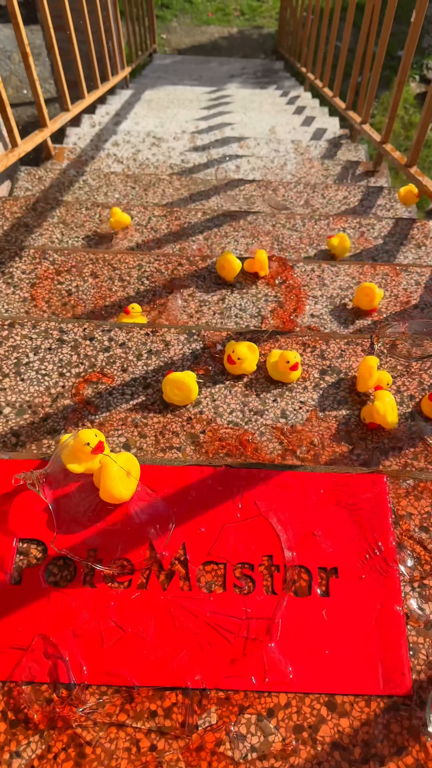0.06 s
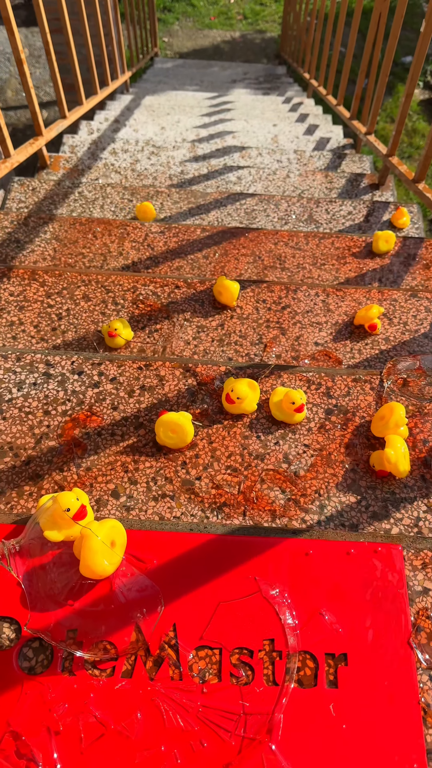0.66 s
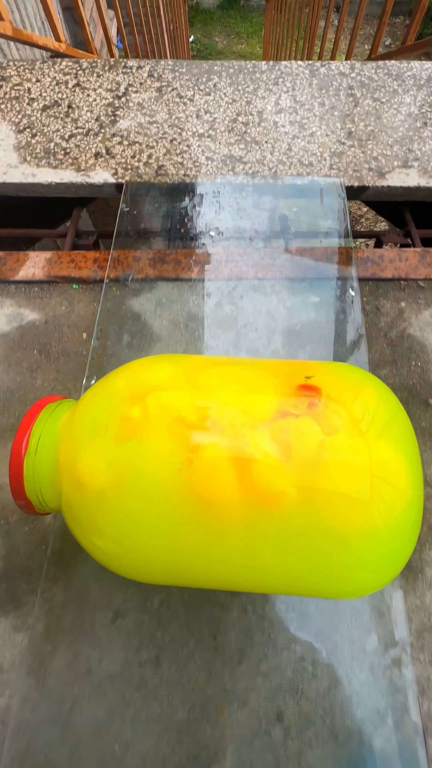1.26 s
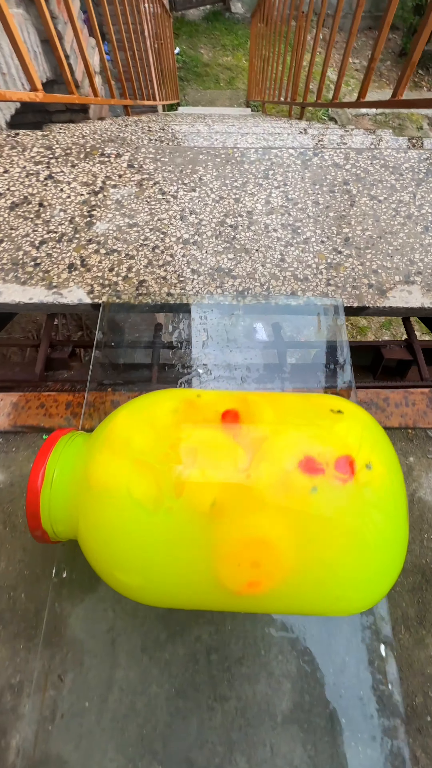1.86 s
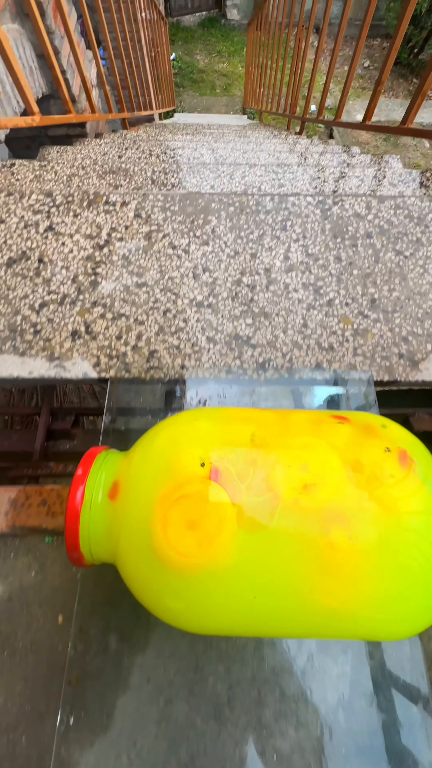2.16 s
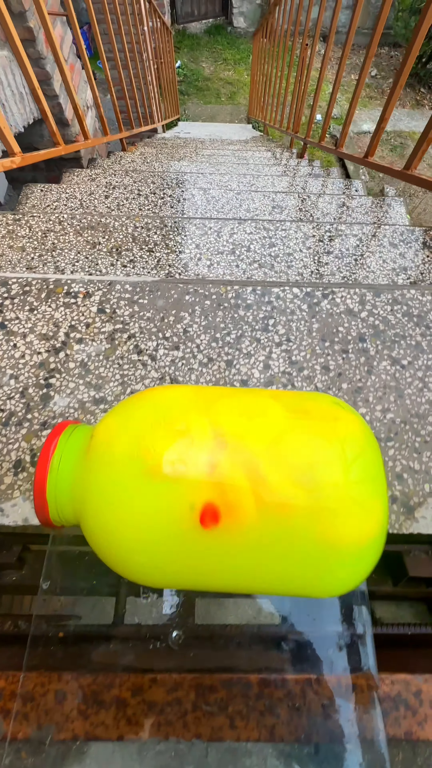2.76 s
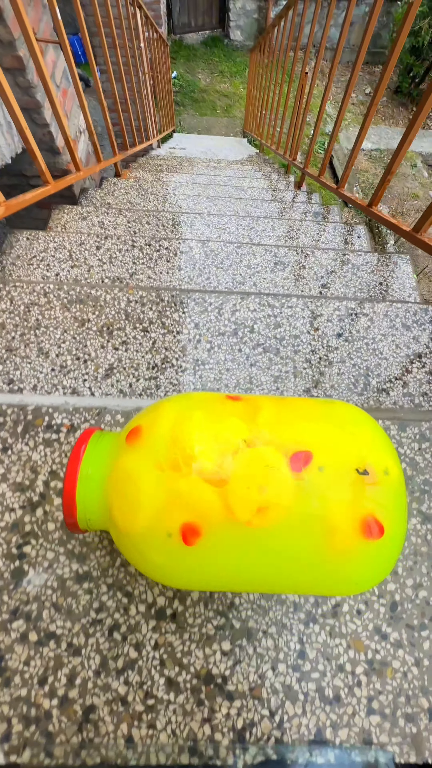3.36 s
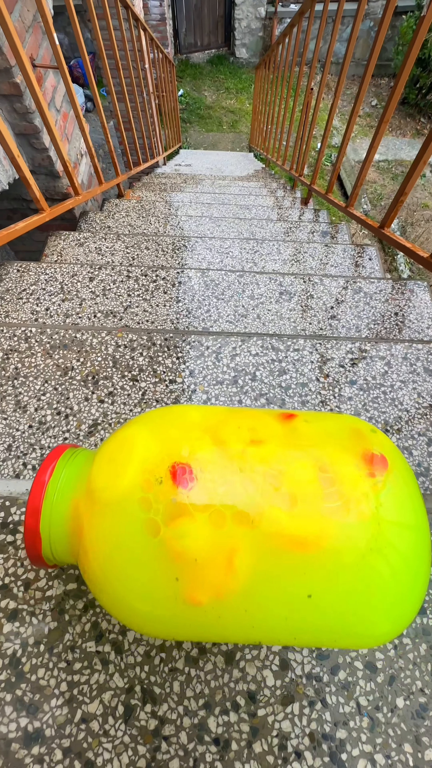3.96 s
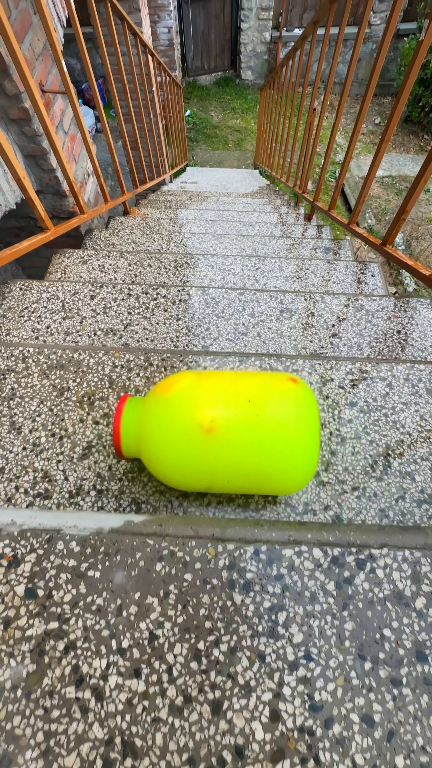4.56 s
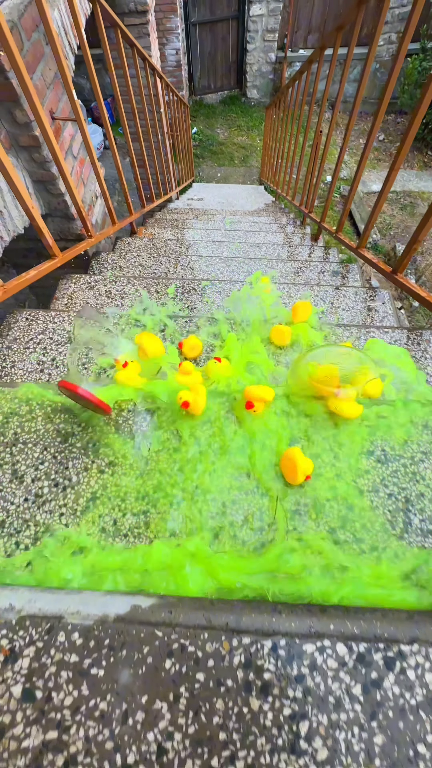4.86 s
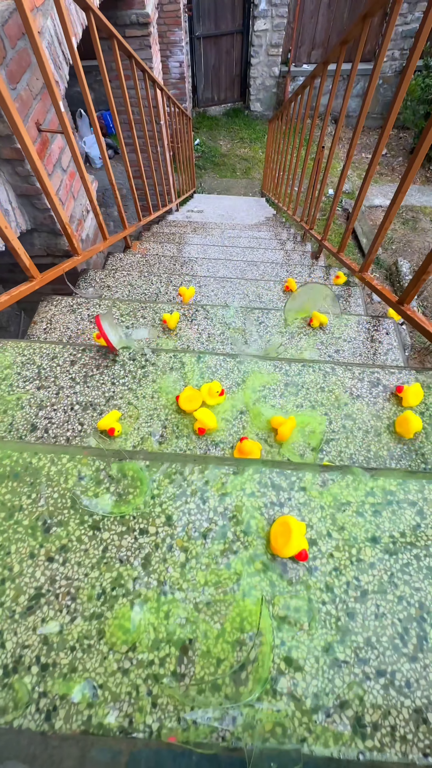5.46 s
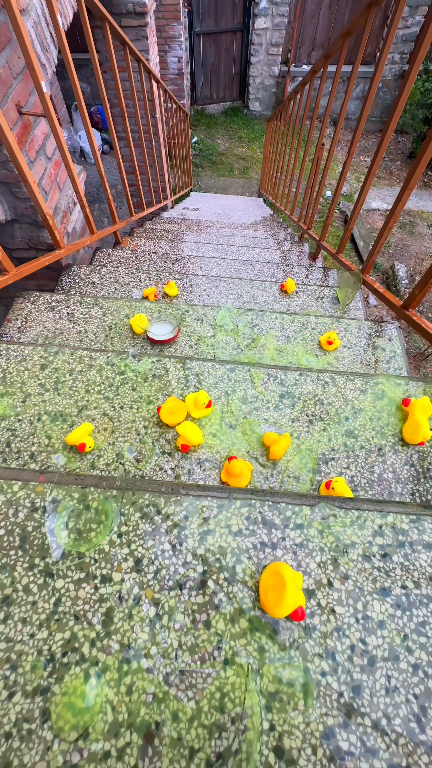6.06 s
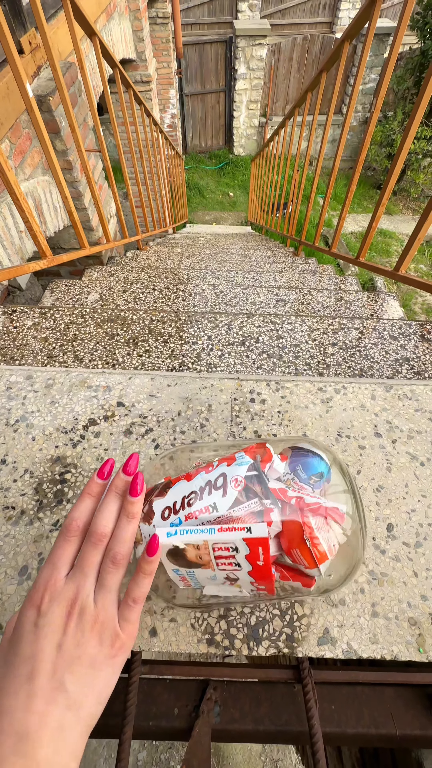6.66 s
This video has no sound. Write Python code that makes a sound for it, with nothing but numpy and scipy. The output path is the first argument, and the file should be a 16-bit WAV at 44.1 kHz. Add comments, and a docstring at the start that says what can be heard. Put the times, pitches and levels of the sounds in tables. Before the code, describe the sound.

Shards clink to rest, then a liquid-filled glass jar rolls, grinds over gritty stone steps and bursts, splashing and scattering ringing pieces.

```python
"""The last shards of a broken jar clink to rest on outdoor stone steps, each ringing on its own modes.
Abruptly, a jar full of liquid and rubber ducks rumbles over a glass pane that rattles on its steel frame.
It crunches across gritty stone, thuds down a step and bursts: a splash, clinking shards, large ringing
pieces. After a second abrupt change a hand nudges a jar of sweets and the wrappers rustle.
Steady outdoor air lies under it all."""
import sys
import numpy as np
from scipy import signal
from scipy.fft import rfft, irfft, next_fast_len
from scipy.io import wavfile
from scipy.ndimage import map_coordinates

SR = 44100
rng = np.random.default_rng(int(sys.argv[2]) if len(sys.argv) > 2 else 0)


def to_wav(s):
    """Save 16-bit WAV."""
    ch = np.atleast_2d(s).T  # columns
    pcm = np.round(np.clip(ch, -1, 1) * 32767)  # PCM
    wavfile.write(sys.argv[1], SR, pcm.astype(np.int16))


N = 295458
TIME = np.arange(N) / SR
T = np.arange(int(.4 * SR)) / SR  # seconds within one impact
ROLL_S, BURST_S, SWEETS_S = 1.278, 4.55, 6.192
TOP_HZ = 15900

# Resonances of the glass pane and the steel frame. Each row: centre in Hz, width in Hz, gain in dB.
PANE_MODES = [(360, 25, -2), (516, 32, 2), (614, 29, 2), (702.4, 22.5, 4), (836, 35, -1), (980, 220, -10.5),
              (1442, 27, -3.5), (1584, 29, -3.5), (1873, 25, -7), (2166, 190, -9.5)]
FRAME_MODES = [(62, 32, -2), (85.4, 10, -0.5), (121.4, 14, 1), (177.3, 22.3, 1), (242, 12.6, -1.5),
               (287.7, 12.6, -1.5), (369, 113, -8.5)]
# Tone of chattering glass and of crunching grit. Each row: frequency in Hz, gain in dB.
CHATTER_EQ = [(530, -8.5), (900, -4), (2180, -1), (3130, -8.5), (3700, -3), (5510, -11.5), (9150, -9),
              (10800, -30), (15000, -23)]
CRUNCH_EQ = [(350, -14.5), (600, -10), (993, -10), (1100, -9), (1300, -8), (1880, -14), (2570, -13),
             (2950, -12), (3750, -14), (4940, -10.5), (8870, -9), (9800, -5), (11300, -19), (15500, -22.5)]


def roll_strength():
    """Gain of the jar's rumble, from the start of its roll until it bursts."""
    # The rumble's contour. Each row: time in seconds, relative level in dB.
    contour = [(1.31, -42.5), (1.49, -39.5), (1.89, -39.5), (2.36, -41.5), (2.88, -33.5), (3.54, -44.5),
               (3.76, -42.5), (4.15, -48.5), (4.54, -48)]
    return amp(np.interp(TIME, *np.transpose(contour))) * (TIME > ROLL_S) * (1 - ramp(BURST_S, .012))


def rolling():
    """Bumps in the rolling glass drive the pane's resonances, less once the jar is on the stone."""
    on_stone = ramp(2.84, 0.16)
    drive = roll_strength() * amp(-9 * on_stone + 3 * wobble(rate=38))
    bumps = resonated(resonated(contacts(rate=500, spread_db=4, size=N), PANE_MODES), PANE_MODES)
    hum = amp(-7) * resonated(rng.standard_normal(N), PANE_MODES)
    drone = unit(softened(bumps + hum))
    drift = 1 + .03 * wobble(rate=5)  # the moving weight detunes the pane
    return drive * np.interp(np.cumsum(drift), np.arange(N), drone)


def rattles():
    """The pane slaps its frame in dying flurries of contacts; its edge buzzes and it rings on hollowly."""
    # Slaps. Each row: start in seconds, relative body and chatter levels in dB, chatter t60 in seconds,
    # hollow note in Hz (it depends on where the jar lies).
    slaps = [(1.559, -28, -33, 0.13, 688), (1.692, -21, -26, 0.077, 693), (1.9163, -5, -18, 0.055, 600),
             (1.924, -8.5, -22, 0.056, 641), (1.947, -4, -18.5, 0.069, 612), (1.958, -9.5, -28, 0.038, 608),
             (1.989, -13, -29.5, 0.066, 615.5), (2.007, -18.5, -27.5, 0.047, 612),
             (2.033, -21, -46, 0.034, 614), (2.16, -18, -18.5, 0.09, 687),
             (2.252, -25.5, -27.5, 0.034, 870), (2.297, -27, -20, 0.068, 970),
             (2.428, -35, -29, 0.075, 900), (2.592, -36, -24.5, 0.055, 950), (2.66, -15, -16, 0.28, 690.5)]
    # The hollow ring. Each row: multiple of the note, level in dB, t60 in seconds.
    partials = [(1, -2.5, 0.16), (1.17, -13, 0.087), (1.33, -7.5, 0.06), (0.6, -16, 0.26),
                (2.31, -15.5, 0.17)]
    # The pane's edge buzzing on steel. Each row: centre in Hz, width in Hz, gain in dB.
    edge_modes = [(1420, 62, 0), (1900, 44, -5), (2190, 190, -4), (2960, 88, -11.5), (3670, 120, -12.5),
                  (4180, 180, -12)]
    body, chatter, buzz, hollow = np.zeros((4, N))
    for s, body_db, chatter_db, t60, hz in slaps:
        flurry = contacts(rate=2800, spread_db=3) * decay(t60) * swell(rise=0.0036)
        knock = unit_attack(contacts(rate=4600, spread_db=4) * decay(t60 / 2))
        note = ring(np.multiply(partials, [hz, 1, 1]), spread_db=0.5) * swell(rise=0.00031)
        add(body, s - .003, amp(body_db) * knock)
        add(chatter, s - .003, amp(chatter_db) * flurry)
        add(buzz, s - .003, amp(body_db) * flurry)
        add(hollow, s - .001, amp(body_db) * note)
    return (amp(8.5) * resonated(body, PANE_MODES) + amp(12) * coloured(chatter, CHATTER_EQ)
            + resonated(buzz, edge_modes) + amp(-8.5) * hollow)


def crack(hz):
    """One grain splits in a tiny flurry, strongest around its own pitch."""
    flurry = contacts(rate=3400, spread_db=6.5) * decay(0.016) * swell(rise=0.001)
    pitched = resonated(flurry, [(hz, 0.4 * hz, 0)])
    return unit_attack(unit_attack(pitched) + amp(-3) * unit_attack(flurry))


def grit():
    """The jar grinds sand: separate cracks over a fine crunch, all ringing briefly in its wall."""
    # The coarsest grains splitting. Each row: start in seconds, relative level in dB, pitch in Hz.
    big_cracks = [(2.7549, -6, 1670), (2.831, -12.5, 7400), (2.899, -15, 6600), (2.913, -12.5, 6880),
                  (2.952, -13.5, 5800), (2.978, -17, 6700), (2.9975, -20, 1150), (3.0266, -7, 4570),
                  (3.0295, -9.5, 1250), (3.0488, -20, 1110), (3.059, -18, 5000), (3.0995, -16, 1410),
                  (3.1219, -14.5, 1170), (3.1451, -14, 1470), (3.151, -13, 4900), (3.1685, -21, 2400),
                  (3.195, -22, 1390), (3.225, -17.5, 4500), (3.2537, -14, 2970), (3.2887, -19, 1360),
                  (3.2982, -21, 1240), (3.3103, -9, 2960), (3.3275, -16, 1300), (3.3357, -18.5, 1230),
                  (3.385, -15.5, 5900), (3.39, -16, 4880), (3.449, -16, 2880), (3.551, -19, 7240),
                  (3.5737, -9.5, 6340), (3.581, -12, 4400), (3.611, -16, 6000), (3.6245, -17.5, 1230),
                  (3.7328, -16.5, 6100), (3.8085, -23.5, 1170), (3.841, -14, 3070), (3.85, -18.5, 1100),
                  (4.0216, -22, 6960), (4.0309, -16, 5630), (4.0625, -20, 2790), (4.119, -31, 5920),
                  (4.152, -31.5, 6870), (4.347, -32, 4500)]
    # Into thicker sand, out again and slowing. Each row: time in seconds, relative level in dB.
    grinding = [(2.73, -57), (2.9, -31), (3.06, -27), (3.27, -28), (3.335, -20), (3.41, -31.5),
                (3.435, -40.5), (3.48, -24), (3.54, -42), (3.64, -29.5), (3.8, -47), (3.97, -55.5)]
    # The jar's wall. Each row: centre in Hz, width in Hz, gain in dB.
    wall_modes = [(1146, 82, -6), (1306, 124, -2), (2950, 130, -1), (4910, 140, -4), (5740, 90, -4)]
    stone_s, step_edge_s = 2.72, 3.98
    # Dust on the pane crunches louder as the jar gathers speed.
    dust = amp(-47.5 + 7 * (TIME - ROLL_S)) * (TIME > ROLL_S) * (TIME < stone_s)
    sand = amp(np.interp(TIME, *np.transpose(grinding))) * (TIME > stone_s)
    bed = dust + sand
    # Each big cracked grain is ground on under the glass.
    crumb_power = sum((amp(db - 19.5) * envelope(s, attack=0.0037, fade_db_per_s=115)) ** 2
                      for s, db, _ in big_cracks)
    load = np.sqrt(bed ** 2 + crumb_power) * (1 - ramp(step_edge_s, 0.066))
    coarse = softened(contacts(rate=420, spread_db=5, size=N)) * amp(3.5 * wobble(rate=48))
    fine = contacts(rate=700, spread_db=5, size=N) + amp(-9) * rng.standard_normal(N)
    fine *= amp(3.5 * wobble(rate=91))
    crush = load * (amp(2) * coarse + amp(1.1) * fine)
    cracks = [(s, amp(db), hz) for s, db, hz in big_cracks]
    for s in [*scattered(ROLL_S, stone_s - ROLL_S, rate=7.6), *scattered(stone_s, .72, rate=34)]:
        gain = np.interp(s, TIME, bed) * amp(rng.normal(7, 2))  # ordinary grains follow the bed's level
        cracks.append((s, gain, 3070 * 2 ** (1.44 * rng.uniform(-1.4, 1))))
    for s, gain, hz in cracks:
        add(crush, s, gain * amp(-3) * crack(hz))
    wall = sum(resonated(crush, [mode]) for mode in wall_modes)
    return amp(6) * coloured(crush + amp(-2.5) * wall, CRUNCH_EQ)


def thuds():
    """The jar lands on stone: liquid damps its ring and surges; it rocks back on its hollow note."""
    # Landings. Each row: start in seconds, blow in dB, rocking in dB, hardness in dB per octave.
    landings = [(2.755, -9.5, -15, 4), (4.381, -13.5, -10.5, 0)]
    # The liquid-filled jar. Each row: frequency in Hz, level in dB, t60 in seconds.
    jar_modes = [(248, -22, 0.1), (367, 3.5, 0.022), (824, 1, 0.014), (1032, -13.5, 0.036),
                 (1342, -5.5, 0.02), (1750, -7, 0.013)]
    # Liquid jolted in the jar. Each row: frequency in Hz, gain in dB.
    slosh_eq = [(40, -16), (120, -12), (260, -5.5), (380, -20), (900, -29), (2000, -38), (8000, -36)]
    rock_hz, rock_every_s, rock_loss_db = 399, 0.02, 4.5
    rock = np.sin(2 * np.pi * rock_hz * T) * decay(0.05) * swell(rise=0.0021)
    out = np.zeros(N)
    for s, db, rock_db, hardness in landings:
        modes = [(hz, level + hardness * np.log2(hz / rock_hz), t60) for hz, level, t60 in jar_modes]
        add(out, s - .001, amp(db) * unit_attack(ring(modes, spread_db=2) * swell(rise=0.0032)))
        for k in range(4):
            add(out, s + 0.0135 + k * rock_every_s, amp(rock_db - k * rock_loss_db) * rock)
        slosh = unit(softened(coloured(rng.standard_normal(len(T)), slosh_eq)))
        add(out, s, amp(db - 11) * slosh * decay(0.3) * swell(rise=0.0014))
    return out


def soft_bumps():
    """Ducks, liquid and frame bump: soft bodies hold no steady note, sag in pitch and die quickly."""
    # Bumps. Each row: start in seconds, relative level in dB, starting pitch in Hz.
    bumps = [(0.043, -41.5, 389), (0.473, -38, 468), (0.686, -36.5, 433), (1.698, -18, 195),
             (2.763, -15.5, 531), (2.778, -18.5, 291), (2.829, -20, 257), (3.074, -24.5, 414),
             (4.724, -24, 718), (4.838, -27, 438), (4.935, -21.5, 439)]
    sag_octaves_per_s = 12
    out = np.zeros(N)
    for s, db, hz in bumps:
        pitch = hz * 2 ** (-sag_octaves_per_s * T) * (1 + 0.27 * wobble(rate=257, size=len(T)))
        tone = np.sin(2 * np.pi * np.cumsum(pitch) / SR)
        add(out, s, amp(db + 10) * tone * decay(0.058) * swell(rise=0.0022))
    return out


def burst():
    """The wall first crackles as cracks race through it, then collapses in one dense crash."""
    out = np.zeros(N)
    for s, db, t60 in [(4.543, -22, 0.08), (4.566, -15, 0.2)]:
        pieces = unit(coloured(contacts(rate=900, spread_db=2.5), CHATTER_EQ))
        add(out, s, amp(db) * swell(rise=0.0052) * decay(t60) * pieces)
    return out


def snap(t60):
    """Glass skids over the rough stone for a few milliseconds."""
    # Tone of the skid. Each row: frequency in Hz, gain in dB.
    skid_eq = [(200, -8.5), (500, 3), (1500, -2), (5000, 4.5), (9000, 4.5), (15000, -7.5)]
    return unit_attack(coloured(contacts(rate=8900, spread_db=0.5) * decay(t60), skid_eq))


def tick():
    """The hard first touch of a glass edge on stone."""
    return amp(-13) * snap(t60=0.004)


def chips():
    """Lesser fragments fall at random, ever weaker; returns rows for shards()."""
    rows = []
    for s in scattered(BURST_S, .62, rate=22):
        db = -27 - 7 * (s - BURST_S)
        hz = 2710 * 2 ** (0.9 * rng.uniform(-1, 1))
        rows.append((s, db, hz, 3.1 * hz, 0, 0.076, db - 9, 4 * rng.standard_normal()))
    return rows


def shards():
    """A fragment clinks on two strong modes over many weak ones; one edge touches, the other skids."""
    # The biggest fragments hit the steps. Each row: start in seconds, relative level in dB, low and high
    # mode in Hz, high over low in dB, t60 in seconds, relative snap level in dB, left over right in dB.
    fragments = [(4.5437, -30.5, 3080, 5600, -18, 0.1, -37.5, 2),
                 (4.557, -14.5, 2260, 6020, -5, 0.01, -13.5, -1),
                 (4.578, -18, 2590, 5650, 4, 0.034, -23, -2),
                 (4.586, -19.5, 2660, 3130, -3, 0.023, -24, -1),
                 (4.5925, -19, 1340, 7250, -10, 0.02, -34, -2),
                 (4.6158, -14, 1130, 4530, 3, 0.021, -29, -0.5),
                 (4.634, -25, 2620, 4730, -13, 0.04, -34, -4), (4.684, -21, 1640, 3720, -27, 0.04, -41, -4),
                 (4.7245, -16, 5959, 9200, 8, 0.028, -23, -1),
                 (4.747, -19.5, 1560, 6740, 4, 0.041, -16.5, -1.5),
                 (4.7958, -26.5, 1980, 7400, -1, 0.06, -39, -4),
                 (4.8503, -16.5, 1590, 4140, -3, 0.18, -15, -1),
                 (4.859, -14, 2560, 4570, 4, 0.053, -16, -3.5), (4.889, -28, 4520, 8140, -1, 0.09, -32, 0),
                 (4.872, -19, 3359, 4480, 2, 0.024, -32, -1),
                 (4.9353, -15.5, 1790, 3630, 3, 0.024, -13.5, -2),
                 (4.9675, -14.5, 1160, 2170, 6, 0.026, -34, -1.5),
                 (4.991, -13.5, 2519, 8440, -9, 0.068, -16, 2),
                 (5.0035, -14.5, 1240, 2534, 4.5, 0.027, -24, 0),
                 (5.0387, -21, 2250, 5350, -7, 0.021, -22, 0),
                 (5.0564, -13.5, 2120, 9280, 8, 0.045, -16.5, -2.5),
                 (5.072, -18.5, 2110, 8640, 2, 0.046, -25, 4),
                 (5.083, -18.5, 2090, 4581, 2, 0.18, -14.5, -8),
                 (5.112, -13.5, 6840, 9130, 9, 0.15, -23, -1.5),
                 (5.1284, -17.5, 2180, 2910, -0.5, 0.099, -27, 0),
                 (5.1894, -23, 4660, 6900, -5, 0.06, -39, 0), (5.2, -24.5, 3530, 4500, 8, 0.047, -39, -3),
                 (5.2243, -15.5, 3040, 5590, 11, 0.021, -21, -2),
                 (5.2752, -15.5, 5380, 8280, -7, 0.019, -36, -2),
                 (5.332, -26.5, 3560, 6080, 9, 0.09, -34, 0),
                 (5.3549, -19.5, 3480, 8000, 9, 0.044, -29, -5.5),
                 (5.433, -30.5, 2260, 6900, -5, 0.03, -34, -2), (5.5236, -26, 3570, 5620, 7, 0.04, -37, -2),
                 (5.6052, -24.5, 4490, 7190, -13, 0.22, -39, -5)]
    left, right = np.zeros((2, N))
    for s, db, low_hz, high_hz, high_db, t60, snap_db, left_db in [*fragments, *chips()]:
        pair = ring([(low_hz, 0, t60), (high_hz, high_db, t60)], spread_db=0.5)
        weak = ring(overtones(db=0, t60=1.05 * t60, count=9), spread_db=2)
        tone = (amp(0.5) * pair + amp(-3) * weak) * damped(kept_db=-5, contact=0.0091)
        skid = amp(snap_db - 1.5) * snap(t60=0.021) * swell(rise=0.00041)
        clink = amp(db) * (tone * swell(rise=0.00086) + tick()) + skid
        add(clink, rng.uniform(.002, .006), amp(db - 7) * snap(t60=0.031))
        add(left, s, amp(left_db / 2) * clink)
        add(right, s, amp(-left_db / 2) * clink)
    return np.array([left, right])


def bouncing(blows, modes, snap_db, weak_db, detune):
    """A piece bounces from edge to edge; the place of contact decides which of its modes ring most."""
    out = np.zeros(N)
    hz, first_db, second_db, t60 = np.transpose(modes)
    for s, db, place, free_s in blows:
        struck = np.column_stack([hz, first_db + np.clip(place, 0, 1) * (second_db - first_db), t60])
        weak = overtones(db=weak_db, t60=0.11, count=18)
        tone = ring(np.vstack([struck, weak]), spread_db=2, detune=detune)
        tone *= damped(kept_db=-7.5, contact=free_s)
        skid = amp(snap_db) * snap(t60=0.036)
        add(out, s, amp(db) * ((tone + skid) * swell(rise=0.0011) + tick()))
    return out


def large_pieces():
    """A piece of the burst jar's wall, then its base, bounce and ring on the stone."""
    # Bounces. Each row: start in seconds, level in dB, place of contact (held to 0-1),
    # free ringing in seconds.
    wall_blows = [(5.47, -19, 0, 0.014), (5.493, -25, 0.22, 0.018), (5.5686, -23, 1, 0.018),
                  (5.589, -24, 0.51, 0.018)]
    base_blows = [(5.6615, -12.5, 0.33, 0.0061), (5.669, -12.5, 0.3, 0.0088), (5.675, -12, 0.01, 0.012),
                  (5.709, -25, 0, 0.03), (5.8067, -25, 0.051, 0.025), (5.864, -15, 0.87, 0.015),
                  (5.8685, -11, 1, 0.023), (5.879, -20, 0.7, 0.01)]
    # Modes. Each row: frequency in Hz, level in dB at place 0 and at place 1, t60 in seconds.
    wall_modes = [(1640, -10, 5, 0.11), (1990, 5, -19, 0.063), (2560, -3, -11, 0.3), (3560, -13, -18, 0.12),
                  (4520, -3, 2, 0.25), (5980, 9.5, 7, 0.17), (6720, 2, 11, 0.18), (7190, 1, -4, 0.2),
                  (8950, -18, 2, .15)]
    base_modes = [(2032, -3.5, -16, 0.31), (2210, -2.5, -19, 0.38), (3197, -7, -20, 0.38),
                  (3548, -0.5, -25, 0.52), (4826, 6.5, -12, 0.16), (5073, -4, 6.5, 0.15),
                  (5970, -5, 0, 0.16), (6769, -6, -14, 0.14), (7330, 0, 2, 0.12), (8500, -12, -16, 0.076),
                  (9530, -19, 3, 0.13)]
    return (bouncing(wall_blows, wall_modes, snap_db=-2.5, weak_db=-4.5, detune=0.0017)
            + bouncing(base_blows, base_modes, snap_db=-4.5, weak_db=-8, detune=0.001))


def settling_pieces():
    """A sliver and a shoulder of the first jar clink to rest."""
    # Bounces. Each row: start in seconds, level in dB, place of contact (held to 0-1),
    # free ringing in seconds.
    sliver_blows = [(0.135, -27.5, -0.5, 0.02), (0.1482, -16, 0.15, 0.012), (0.3475, -18.5, 0.05, 0.01),
                    (0.381, -29.5, 0.6, 0.04), (0.4, -32, 0, 0.01), (0.571, -22.5, 0.4, 0.014),
                    (0.5755, -20, 2.5, 0.01), (0.717, -29, 1, 0.022), (0.748, -24.5, 1, 0.02),
                    (0.861, -35.5, 1.2, 0.026), (0.924, -40, 0.1, 0.0089)]
    shoulder_blows = [(0.0064, -25, 0.12, 0.051), (0.03, -27.5, 0.099, 0.045), (0.2636, -24, 1, 0.029),
                      (0.281, -28.5, 0.86, 0.0072)]
    # Modes. Each row: frequency in Hz, level in dB at place 0 and at place 1, t60 in seconds.
    sliver_modes = [(1073, -24, -23, 0.97), (1820, -21, -33, 0.14), (2824, -13.5, -2.5, 0.36),
                    (3950, -2.5, -25, 0.23), (5135, 5, 9, 0.1), (6580, 10, -8, 0.1), (7940, 7, -6, 0.1),
                    (9185, 5.5, -15, 0.092), (9600, -2, -2, 0.12)]
    shoulder_modes = [(1643, 0, -30, 0.25), (2430, -5.5, -28, 0.16), (2770, -5, -13, 0.26),
                      (3396, -5, 1, 0.22), (4150, -7, -23, 0.15), (5472, 2, -10, 0.26), (5980, -2, 7, 0.13),
                      (6610, 0, -13.5, 0.14), (7200, -4, 9.5, 0.1), (9050, -6, -2, 0.14),
                      (9930, -15, 6, 0.08)]
    return (bouncing(sliver_blows, sliver_modes, snap_db=-9.5, weak_db=-12.5, detune=0.0041)
            + bouncing(shoulder_blows, shoulder_modes, snap_db=-8, weak_db=-5.5, detune=0.0049))


def splinters():
    """Tiny pieces of the first jar settle on the stone in dull, fading ticks."""
    out = np.zeros(N)
    for s in scattered(0, ROLL_S, rate=14):
        add(out, s, amp(-32.5 - 20 * s) * snap(t60=0.013))
    return softened(out)


def flow():
    """Gains of sliding glass and of liquid: waves build quickly and drain away over a thin steady run."""
    # Waves landing on the steps. Each row: start in seconds, relative glass and liquid levels in dB.
    waves = [(4.549, -32, -28.5), (4.703, -32, -30.5), (4.86, -27.5, -33.5), (5.029, -27.5, -37.5),
             (5.67, -36, -57)]
    skitter_db, trickle_db = -48, -46.5
    run = envelope(BURST_S, attack=0.011, hold=1.44, fade_db_per_s=44)
    power = (amp([[skitter_db], [trickle_db]]) * run) ** 2
    for s, glass_db, water_db in waves:
        power += (amp([[glass_db], [water_db]]) * envelope(s, attack=0.011, fade_db_per_s=77)) ** 2
    return np.sqrt(power) * (TIME < SWEETS_S)


def spill():
    """Splinters tinkle and skitter down the steps while the liquid bubbles and splashes out."""
    glass, water = flow()
    tinkle = pings(rate=130, centre_hz=3700, octaves=1.35, cycles=300, spread_db=3.5, rise=0, count=3)
    skitter = unit(coloured(contacts(rate=260, spread_db=5, size=N), CRUNCH_EQ))
    bubbles = pings(rate=370, centre_hz=817, octaves=1.31, cycles=52, spread_db=8.5, rise=0.14, count=1)
    # Liquid hitting stone. Each row: frequency in Hz, gain in dB.
    splash_eq = [(88, -54), (150, -9), (280, -18), (418, -9), (975, -8.5), (1580, -1), (1930, -6),
                 (2500, -2.5), (3250, -44), (5500, -120)]
    splash = unit(coloured(contacts(rate=1600, spread_db=31, size=N), splash_eq))
    return (glass * (amp(2) * tinkle + amp(-3.5) * skitter)
            + water * (amp(-0.6) * bubbles + amp(-3) * splash))


def frame():
    """The rolling jar shakes the steel frame into a low rumble."""
    shaking = resonated(contacts(rate=830, spread_db=2.5, size=N), FRAME_MODES)
    return amp(4) * roll_strength() * unit(softened(shaking))


def boom():
    """The weight of the liquid booms on the step as the jar bursts."""
    out = np.zeros(N)
    bass = coloured(rng.standard_normal(len(T)), [(20, -6.5), (55, -3), (130, -10.5), (300, -18), (900, -75)])
    add(out, 4.552, amp(-26.5) * unit(bass) * decay(0.37) * swell(rise=0.0035))
    return out


def sweets():
    """Wrappers rustle in the nudged jar, over hiss and a low drone of the frame."""
    # Wrappers shifting. Each row: peak time in seconds, relative level in dB, half length in seconds.
    rustles = [(6.234, -29.5, 0.0048), (6.312, -34.5, 0.0032), (6.331, -31, 0.0044), (6.641, -38.5, 0.017),
               (6.665, -19, 0.0092)]
    # Tone of the wrappers and of the air around them. Each row: frequency in Hz, gain in dB.
    wrapper_eq = [(900, -13), (1600, -26.5), (2350, -8), (2700, -22), (3250, 0), (3750, -19), (4250, -3.5),
                  (5000, -23), (5900, -20), (7000, -8), (8400, -8.5), (9500, 0.5), (10800, -19.5),
                  (15000, -17.5)]
    air_eq = [(15, -57), (25, -37), (54, -1), (172, -20), (415, -7), (978, -29), (1310, -41), (1810, -26.5),
              (2130, -48), (5140, -27.5), (6370, -32), (7280, -22.5), (9770, -36), (10600, -88),
              (15000, -70)]
    air = amp(-38.5) * unit(coloured(rng.standard_normal(N), air_eq))
    drone = amp(-39.5 + 5.3 * ramp(SWEETS_S, 0.58)) * unit(resonated(rng.standard_normal(N), FRAME_MODES))
    motion = sum(amp(db) * np.exp(-.5 * ((TIME - s) / width) ** 2) for s, db, width in rustles)
    crinkle = unit(coloured(contacts(rate=3400, spread_db=6, size=N), wrapper_eq))
    return (TIME > SWEETS_S) * (air + drone + amp(2.5) * motion * crinkle)


def yard():
    """Steady, wide outdoor air, a little louder and duller from the start of the roll."""
    # Tone of the air, and its stereo width as side over mid. Each row: frequency in Hz, gain in dB.
    air_eq = [(15, -65.5), (25, -23), (40, -7.5), (64, -5.5), (131, -18), (191, -12.5), (335, -16),
              (2560, -35), (6540, -32), (9770, -31), (10600, -51), (15000, -73)]
    side_eq = [(25, -21.5), (60, -2), (130, -20), (1000, 0), (5000, -2.5)]
    mid, side = unit(coloured(rng.standard_normal((2, N)), air_eq))
    side = filtered(side, lambda hz: amp(along(side_eq, hz)))
    air = mid + np.array([side, -side])
    return np.where(TIME < ROLL_S, amp(-52.5) * air, amp(-49.5) * softened(air))


def stairway(x, left_db, near_db, far_db):
    """Direct sound in stereo, scatter off the nearest steps and a faint echo of the walls."""
    # Decay of the walls' echo. Each row: frequency in Hz, t60 in seconds.
    echo_t60 = [(150, 0.48), (1000, 0.35), (5000, 0.28), (12000, 0.082)]
    scatter_eq = [(150, -13.5), (500, -6.5), (1100, -13), (2300, -11), (9000, -5.5)]
    left_lag_s = 2.7e-5
    direct = filtered(x, lambda hz: np.exp(1j * np.pi * hz * left_lag_s * np.array([[-1], [1]])))
    scatter = coloured(rng.standard_normal((2, len(T))), scatter_eq) * decay(0.021)
    hz, t, bands = signal.stft(rng.standard_normal((2, len(T))), SR, nperseg=256)
    bands *= amp(-60 * t / along(echo_t60, hz)[:, None])
    tail = signal.istft(bands, SR, nperseg=256)[1][:, :len(T)] * swell(rise=0.0065)
    impulse = (amp(near_db) * unit(scatter) + amp(far_db) * unit(tail)) / np.sqrt(len(T))
    reflections = signal.fftconvolve(np.atleast_2d(x), impulse, axes=1)[:, :N]
    return (direct + reflections) * amp(left_db * np.array([[.5], [-.5]]))


def contacts(rate, spread_db, size=len(T)):
    """Random tiny impacts of uneven strength, rate a second, rms 1."""
    strength = amp(spread_db * np.clip(rng.standard_normal(size), -2, 2)) * rng.choice([-1, 1], size)
    return unit(strength * (rng.random(size) < rate / SR))


def ring(modes, spread_db, detune=0.0018):
    """One blow on (Hz, dB, t60) modes; each contact gives new strengths and a slight detuning."""
    hz, db, t60 = np.transpose(modes)[..., None]
    strength = amp(db + spread_db * np.clip(rng.standard_normal(hz.shape), -1.5, 1.5))
    hz = hz * (1 + detune * rng.standard_normal(hz.shape))
    tones = np.sin(2 * np.pi * (hz * T + rng.random(hz.shape)))
    return unit_attack(np.sum(strength * decay(t60) * tones, axis=0))


def overtones(db, t60, count):
    """The many irregular weaker modes of a broken piece."""
    hz = rng.uniform(1375, 10200, count)
    return np.column_stack([hz, rng.normal(db, 4.7, count), t60 * rng.uniform(0.61, 0.98, count)])


def pings(rate, centre_hz, octaves, cycles, spread_db, rise, count):
    """Small damped tones for two seconds after the burst, count per impact; rise bends their pitch up."""
    starts = rng.random(int(rate * 2)) * 2 + BURST_S
    gain = amp(spread_db * np.clip(rng.standard_normal((len(starts), 1)), -1.5, 1.5))
    t = T[:3000]
    samples = (starts * SR).astype(int)[:, None] + np.arange(len(t))
    cloud = np.zeros(2 * N)
    for _ in range(count):
        hz = np.minimum(centre_hz * 2 ** (octaves * rng.uniform(-1, 1, gain.shape)), TOP_HZ)
        age = t * hz / cycles
        tones = gain * amp(-60 * age) * np.sin(2 * np.pi * hz * t * (1 + rise * np.minimum(age, 1)))
        cloud += np.bincount(samples.ravel(), tones.ravel(), 2 * N)
    return unit(cloud[:N]) * np.sqrt(2 * SR / N)


def damped(kept_db, contact):
    """Stone drains a piece's ring over contact seconds, leaving it at kept_db."""
    return amp(kept_db) + (1 - amp(kept_db)) * np.exp(-(T / contact) ** 2)


def swell(rise):
    """A contact builds up over rise seconds."""
    return 1 - np.exp(-(T / rise) ** 2)


def decay(t60):
    """Dies away by 60 dB in t60 seconds."""
    return amp(-60 * T / t60)


def ramp(s, length):
    """Rises from 0 to 1 over length seconds, starting at time s."""
    return np.clip((TIME - s) / length, 0, 1)


def envelope(s, attack, fade_db_per_s, hold=0):
    """Gain that builds up from time s, holds and dies away."""
    return ramp(s, attack) * amp(-fade_db_per_s * np.maximum(TIME - s - attack - hold, 0))


def wobble(rate, size=N):
    """A smooth random curve, rate knots a second."""
    return map_coordinates(rng.standard_normal(int(size * rate / SR) + 4), [np.arange(size) * rate / SR])


def scattered(s, length, rate):
    """Irregular moments from time s on, rate a second."""
    slots = np.arange(int(length * rate))
    return s + (slots + rng.random(len(slots))) / rate


def filtered(x, response):
    """x times a complex response of frequency."""
    n = x.shape[-1]
    padded = 2 * next_fast_len(n // 2 + 4096)
    return irfft(rfft(x, padded) * response(np.fft.rfftfreq(padded, 1 / SR)), padded)[..., :n]


def coloured(x, spectrum):
    """Causal filter with the given (Hz, dB) shape."""
    def response(hz):
        cepstrum = irfft(np.log(amp(along(spectrum, hz)) + 1e-6))
        cepstrum[1:len(hz) - 1] *= 2
        cepstrum[len(hz):] = 0
        return np.exp(rfft(cepstrum))
    return filtered(x, response)


def resonated(x, peaks):
    """x through a body's (Hz, width, dB) resonances, alternating in polarity."""
    return filtered(x, lambda f: sum((-1) ** k * amp(db) * 1j * f * width / (hz**2 - f**2 + 1j * f * width)
                                     for k, (hz, width, db) in enumerate(peaks)))


def softened(x, corner_hz=2600):
    """x with its treble rolled off."""
    return filtered(x, lambda hz: 1 / np.sqrt(1 + (hz / corner_hz) ** 4))


def along(points, hz):
    """Interpolate (Hz, value) points on a log axis."""
    freqs, values = np.transpose(points)
    return np.interp(np.log(hz + 1), np.log(freqs), values)


def amp(db):
    """Decibels to gain."""
    return np.exp(np.asarray(db) * np.log(10) / 20)


def unit(x):
    """Scale to rms 1."""
    return x / np.sqrt(np.mean(x ** 2) + 1e-20)


def unit_attack(x):
    """Scale a blow so that its first 5 ms have rms 1."""
    return x / np.sqrt(np.mean(x[:220] ** 2) + 1e-20)


def add(track, s, sound):
    """Mix a sound into a track at time s."""
    part = track[max(round(s * SR), 0):][:len(sound)]
    part += sound[:len(part)]


def scene():
    """The pane lies to the listener's left, the steps nearly straight ahead."""
    settling = settling_pieces() + splinters()
    large = large_pieces()
    return (stairway(settling, left_db=0.5, near_db=-2.5, far_db=-7)
            + stairway(rolling() + rattles(), left_db=6, near_db=-9, far_db=-13)
            + stairway(grit() + sweets(), left_db=1.2, near_db=-4, far_db=-15.5)
            + stairway(thuds() + soft_bumps(), left_db=2, near_db=-7, far_db=-19)
            + stairway(burst() + shards() + spill(), left_db=2.3, near_db=-3.5, far_db=-14)
            + stairway(large, left_db=0, near_db=-4, far_db=-8)
            + frame() + boom() + yard())


def record(dry):
    """The microphone's bass roll-off and treble colour, soft saturation of the peaks, a band limit."""
    # The microphone's response. Each row: frequency in Hz, gain in dB.
    microphone_eq = [(20, -24), (55, -2), (7000, -1), (9300, -5), (10500, -16.5), (12500, -14), (15200, 4)]
    x = filtered(dry, lambda hz: amp(along(microphone_eq, hz)))
    x = x / (1 + np.abs(x / .92) ** 6) ** (1 / 6)
    return filtered(x, lambda hz: np.clip((TOP_HZ - hz) / 400 + .5, 0, 1))


dry = scene()
out = record(dry)
to_wav(out)
```